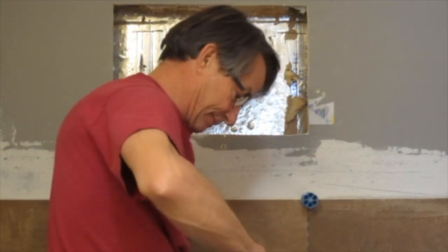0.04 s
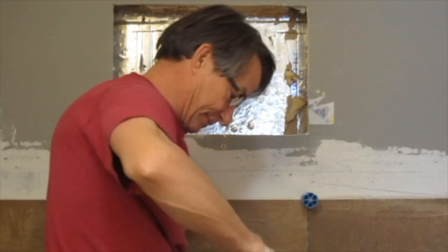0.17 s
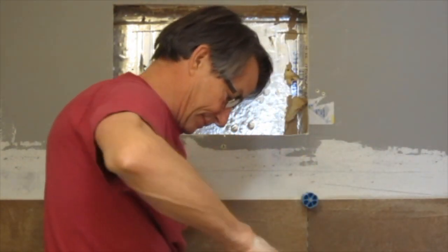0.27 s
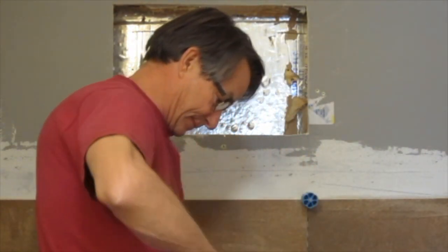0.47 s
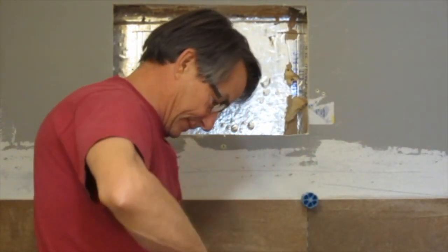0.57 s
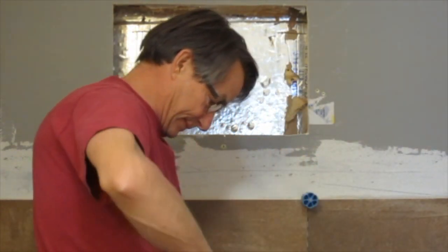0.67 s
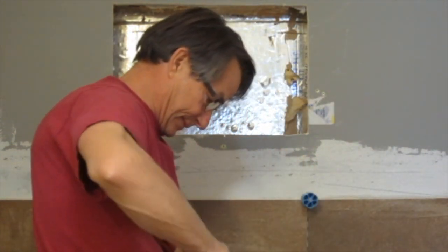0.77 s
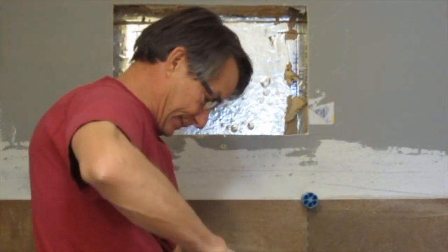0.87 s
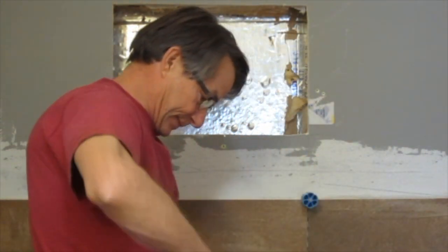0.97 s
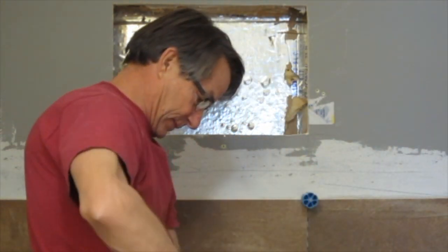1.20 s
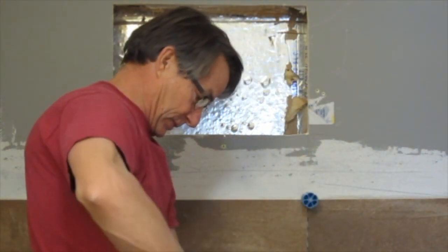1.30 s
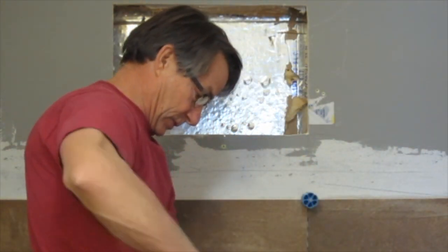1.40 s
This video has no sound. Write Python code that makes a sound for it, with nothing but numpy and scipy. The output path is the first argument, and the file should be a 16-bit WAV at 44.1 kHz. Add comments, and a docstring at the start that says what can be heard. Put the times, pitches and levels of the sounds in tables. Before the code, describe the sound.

A hand tool scrapes a board's edge in a bare, echoing room, heard from some distance. A low knock at the start leads into a rough, hissing stroke from 0.2 to 0.3 seconds. A softer knock at 0.6 precedes a second stroke swelling until 0.85, board and blade ringing faintly. A sharper knock comes at 1.2, then a light slide and a third crunchy bite around 1.5 seconds.

```python
"""Hand tool on a board's edge

A bare, echoing room, the microphone far enough off to hear mostly the walls. A hand tool is set down
with a knock and pushed along the edge of a board, biting harder and harder: the teeth hiss, chips tear,
and board and blade ring. After two such strokes it is set down again, slides lightly and begins to bite."""
import sys
import numpy as np
from scipy import signal
from scipy.fft import rfft, irfft
from scipy.io import wavfile

SR = 44100
rng = np.random.default_rng(int(sys.argv[2]) if len(sys.argv) > 2 else 0)


def transcribe(signal):
    """Save signal, clipped to [-1, 1], as a 16-bit WAV file at the path in sys.argv[1]."""
    frames = np.atleast_2d(signal).T
    limited = np.clip(frames, -1, 1)
    pcm = np.round(limited * 32767).astype(np.int16)
    wavfile.write(sys.argv[1], SR, pcm)


N = 63945
TIME = np.arange(N) / SR

# Room tone. Each row: frequency in Hz, relative level in dB.
ROOM_TONE_SPECTRUM = [(25, -3), (40, -8), (62, 5.5), (85, -7), (118, 1.5), (175, -7.5), (370, -6.5),
                      (450, -9.5), (1400, -15.5), (2200, -19.5), (5000, -32.5), (8500, -33), (11500, -52),
                      (16000, -50)]
# The room's tail. Each row: frequency in Hz, time to fall 60 dB in seconds.
ROOM_DECAY = [(150, 0.19), (500, 0.44), (1600, 0.43), (4000, 0.4), (8000, 0.32), (14000, 0.14)]
# Modes of board and blade. Each row: frequency in Hz, relative level in dB, time to fall 60 dB in seconds.
BOARD_MODES = [(154.7, -13.5, .4), (280.2, -2, 0.48), (377, -3.5, 0.46), (496.9, 4, 0.38), (614, -6, 0.37),
               (683, 0.5, 0.38), (736.6, 4, 0.1), (763.3, -2, .3), (852.5, -8.5, 0.27), (894, -5, 0.18),
               (1056, -4.5, 0.46)]
BLADE_MODES = [(1155, -7.5, 0.52), (1226, -5, 0.38), (1296, -8.5, 0.3), (1377, -9.5, 0.17),
               (1457, -5.5, 0.37), (1530.5, 1.5, 0.35), (1566, -1, 0.46), (1610, -3, 0.28),
               (1781, -7.5, 0.31)]
# The tool meets the board. Each row: time in seconds, thump in dB, thud in dB and Hz, clack in dB and Hz,
# its width in octaves, clink in dB and Hz, tick in dB, its top in Hz, board ring and blade ring in dB.
KNOCKS = [(0.0598, -12.5, -1.5, 680, -6.5, 1130, 0.32, -17, 3040, -10, 4200, -18.5, -42),
          (0.6019, -19, -9.5, 764, -12.5, 705, 0.23, -18.5, 1536, -17, 16000, -23, -21.5),
          (1.1756, -16, 3, 845, 4, 1443, 0.53, -9, 2610, -5, 3640, -20.5, -10.5)]
# Light sliding before each cut. Each row: start and end in seconds, level in dB.
SLIDES = [(0.127, 0.19, -51.5), (0.597, 0.662, -47.5), (1.214, 1.45, -51.5)]
# Cuts. Each row: start, full bite and let-go in seconds, bite at the start and at full in dB, tearing trim
# in dB, its low cut in Hz, board trim and blade trim in dB, lag of the blade's ring in seconds.
STROKES = [(0.18, 0.274, 0.3, -14.5, 1.5, -2, 110, -4.5, 1, .006),
           (0.66, 0.811, 0.86, -20.5, 0.5, 1.5, 240, -5.5, -4.5, 0.022),
           (1.441, 1.49, 1.55, -11.5, 6, 3, 200, -64, -21.5, 0)]
# Hiss of teeth, sizzle of finest dust, crunch of chips. Each row: frequency in Hz, relative level in dB.
HISS_SPECTRUM = [(150, -23), (500, 5.5), (1000, 3), (1600, 6), (2000, 2), (2700, 3), (4000, -2),
                 (6000, -2.5), (8000, -3.5), (10000, -12), (11700, -30), (13500, -20), (16000, -38)]
DUST_SPECTRUM = [(3000, -17), (6000, 4), (8500, -12), (10000, -2), (11700, -22), (13500, -11), (16000, -10)]
CRUNCH_SPECTRUM = [(60, -32), (140, -10.5), (280, -7.5), (600, 2.5), (800, 2.5), (950, -13.5), (1250, -0.5),
                   (1650, 0.5), (2000, -28.5), (3000, -25), (6000, -24.5), (12000, -67)]


def from_db(db):
    """Decibels to gain."""
    return 10 ** (np.asarray(db) / 20)


def unit_rms(x):
    """Scale to unit rms."""
    return x / np.sqrt(np.mean(x ** 2) + 1e-20)


def at_hz(points, hz):
    """Read a table on a log-frequency axis."""
    f, value = np.transpose(points)
    return np.interp(np.log(np.maximum(hz, 1)), np.log(f), value)


def colour(x, spectrum):
    """Minimum-phase filter with the given spectrum and unit power gain."""
    size = 4096
    gains = from_db(at_hz(spectrum, np.arange(size // 2 + 1) * SR / size))
    cepstrum = irfft(np.log(gains))
    cepstrum[1:size // 2] *= 2
    cepstrum[size // 2 + 1:] = 0
    response = irfft(np.exp(rfft(cepstrum)))
    return signal.fftconvolve(x, response / np.linalg.norm(response))[:N]


def band(x, low, high):
    """Band-pass, edges in Hz."""
    sos = signal.butter(2, [low, min(high, SR / 2 - 100)], "band", fs=SR, output="sos")
    return signal.sosfilt(sos, x + 1e-18)


def ring(x, hz, t60):
    """One mode, with unit power gain."""
    r, w = np.exp(-np.log(1000) / (t60 * SR)), 2 * np.pi * hz / SR
    gain = np.sin(w) * np.sqrt(2 * (1 - r * r))
    return signal.lfilter([0, gain], [1, -2 * r * np.cos(w), r * r], x + 1e-18)


def grains(per_s, spread_db):
    """Random clicks of uneven size, rms 1."""
    sizes = from_db(spread_db * np.minimum(rng.exponential(1, N), 3)) * rng.choice([-1, 1], N)
    return unit_rms(sizes * (rng.random(N) < per_s / SR))


def bite_db(stroke, lag_s=0, catch_s=0.0068, sag_db=7, release_db_per_s=408):
    """Depth of cut: a sudden catch, a steady swell, a short sag and a quick release."""
    start, full, end, start_db, full_db = stroke[:5]
    t = TIME - lag_s
    swell = np.interp(t, [start - catch_s, start, full, end], [-90, start_db, full_db, full_db - sag_db])
    return swell - release_db_per_s * np.maximum(t - end, 0)


def room_tone():
    """The low, steady noise of the room."""
    return unit_rms(colour(rng.standard_normal(N), ROOM_TONE_SPECTRUM))


def room_response(delay_s=0.003, early_db=-4, early_t60=0.088, tail_db=2):
    """Close walls give a burst of early echoes, then a tail that dies sooner in the treble."""
    edges = np.geomspace(60, 20000, 15)
    white, out = rng.standard_normal((2, N)), np.zeros(N)
    age = np.maximum(TIME - delay_s, 0)
    for k, (low, high) in enumerate(zip(edges, edges[1:])):
        decays = [(early_db, early_t60), (tail_db, at_hz(ROOM_DECAY, np.sqrt(low * high)))]
        fade = sum(from_db(db) * np.exp(-np.log(1000) * age / t60) / np.sqrt(t60) for db, t60 in decays)
        echoes = band(white[k % 2] * fade * (age > 0), low, high)
        out += echoes / np.linalg.norm(echoes) * np.sqrt(2 * (high - low) / SR)
    return out


def room_echoes(x, sets=4, change_s=0.012):
    """The tool keeps moving, so its sound fades from one set of echoes into the next."""
    out = np.zeros(N)
    for k in range(sets):
        away = (TIME / change_s + k) % sets - 1
        share = np.sqrt(np.maximum(1 - np.abs(away), 0))
        out += signal.fftconvolve(x * share, room_response())[:N]
    return out


def wall_slap(x, delay_s=0.006):
    """The nearest wall throws a sharp sound straight back at the microphone."""
    return np.interp(TIME - delay_s, TIME, x, left=0)


def resonate(chips, modes, cuts, knock_dbs):
    """A body rings at each knock and under each cut, given as (level in dB, swell in dB over time)."""
    blows, out = np.zeros(N), np.zeros(N)
    for knock, db in zip(KNOCKS, knock_dbs):
        blows[int(knock[0] * SR)] = from_db(db)
    drives = [(from_db(db), chips * from_db(swell_db)) for db, swell_db in cuts]
    for k, (hz, db, t60) in enumerate(modes):
        rubbed = sum(gain * unit_rms(ring(drive, hz, t60)) for gain, drive in drives)
        out += (-1) ** k * from_db(db) * (rubbed + ring(blows, hz, t60))
    return out


def board(chips, base_db=-41, growth=2.05):
    """The board booms when knocked and once the cut is deep; growth is dB of drive per dB of bite."""
    cuts = [(base_db + stroke[7], growth * bite_db(stroke, lag_s=0.0045)) for stroke in STROKES]
    return resonate(chips, BOARD_MODES, cuts, [knock[-2] for knock in KNOCKS])


def blade(chips, base_db=-43, growth=1.11):
    """The blade rings when knocked and towards the end of a stroke."""
    cuts = [(base_db + stroke[8], growth * bite_db(stroke, lag_s=stroke[9])) for stroke in STROKES]
    return resonate(chips, BLADE_MODES, cuts, [knock[-1] for knock in KNOCKS])


def knocks(thump_hz=160, contact_s=0.0051):
    """Each set-down is a low thump, a woody thud, a harder clack, a thin clink and a tick of the teeth."""
    out = np.zeros(N)
    for (start, thump_db, thud_db, thud_hz, clack_db, clack_hz, clack_octaves,
         clink_db, clink_hz, tick_db, top_hz, *_) in KNOCKS:
        click = np.zeros(N)
        click[int(start * SR)] = 1
        for db, hz, octaves in [(thump_db, thump_hz, 1.2), (thud_db, thud_hz, 0.96),
                                (clack_db, clack_hz, clack_octaves), (clink_db, clink_hz, 0.091)]:
            body = band(click, hz / 2 ** (octaves / 2), hz * 2 ** (octaves / 2))
            out += from_db(db) * body / np.linalg.norm(body)
        burst = rng.standard_normal(N) * (TIME >= start) * np.exp(-np.abs(TIME - start) / contact_s)
        tick = colour(burst / np.linalg.norm(burst), HISS_SPECTRUM)
        out += from_db(tick_db) * signal.lfilter(*signal.butter(1, top_hz, fs=SR), tick)
    return out


def teeth(base_db=-21.5, clicks_per_s=6000, spread_db=2.5, dust_db=-38, dust_growth=0.85):
    """Dense tiny clicks hiss under every cut and, faintly, in the slides; a light touch is brighter."""
    cutting = sum(from_db(base_db + bite_db(stroke)) for stroke in STROKES)
    fade_s = 0.021
    sliding = sum(from_db(db) * np.interp(TIME, [start, start + fade_s, end, end + fade_s], [0, 1, 1, 0])
                  for start, end, db in SLIDES)
    touch = cutting + sliding
    hiss = colour(grains(clicks_per_s, spread_db) * touch, HISS_SPECTRUM)
    dust = grains(clicks_per_s, spread_db) * (touch / touch.max()) ** dust_growth
    return hiss + from_db(dust_db) * colour(dust, DUST_SPECTRUM)


def tearing(chips, base_db=-22.5, growth=1.47):
    """Chips break away with a dull crunch that grows faster than the hiss."""
    crunch = np.zeros(N)
    for stroke in STROKES:
        trim_db, low_cut_hz = stroke[5:7]
        burst = chips * from_db(base_db + trim_db + growth * bite_db(stroke, lag_s=0.015))
        crunch += band(burst, low_cut_hz, SR / 2)
    return colour(crunch, CRUNCH_SPECTRUM)


def scene():
    """Tool and board at one microphone, mostly by way of the walls, over low room tone."""
    chips = grains(per_s=700, spread_db=7)  # the same clicks drive crunch, board and blade
    cutting = teeth() + tearing(chips)
    blows = knocks()
    background = from_db(-50.5) * room_tone()
    walls = room_echoes(cutting + blows) + from_db(-12) * wall_slap(blows)
    direct = from_db(-15) * cutting + from_db(-12) * blows
    return (background + walls + board(chips) + blade(chips) + direct)[None]


def record(dry, cutoff_hz=15900):
    """The recorder cuts the highest treble steeply."""
    return signal.sosfilt(signal.ellip(12, .1, 80, cutoff_hz, fs=SR, output="sos"), dry)


dry = scene()
out = record(dry)
transcribe(out)
```